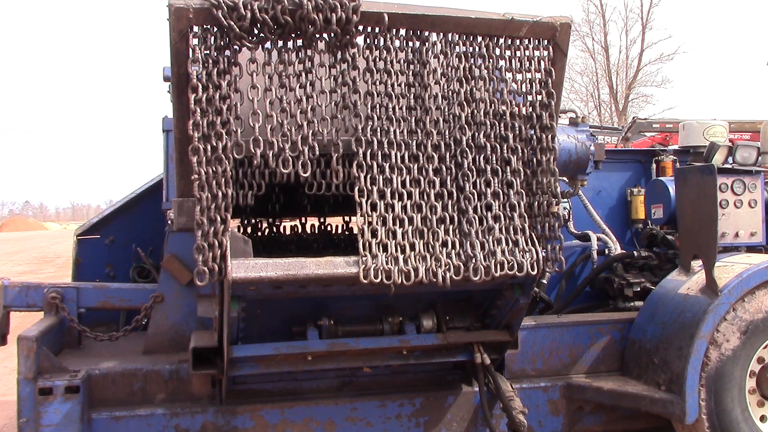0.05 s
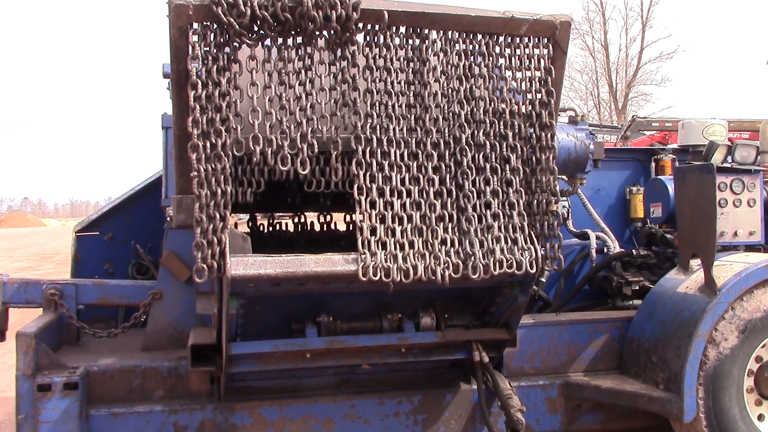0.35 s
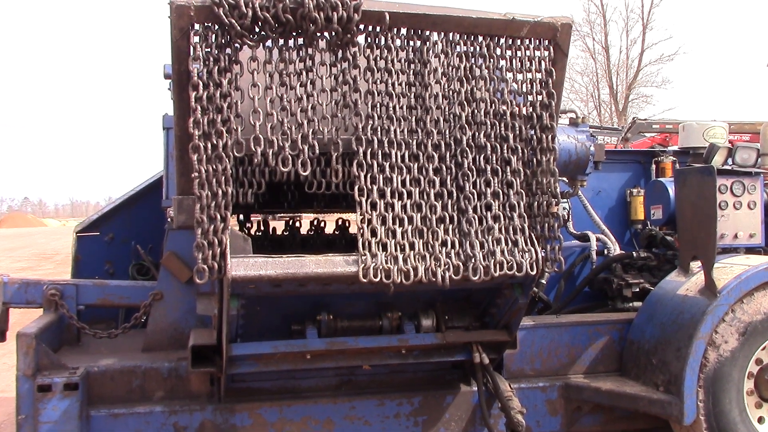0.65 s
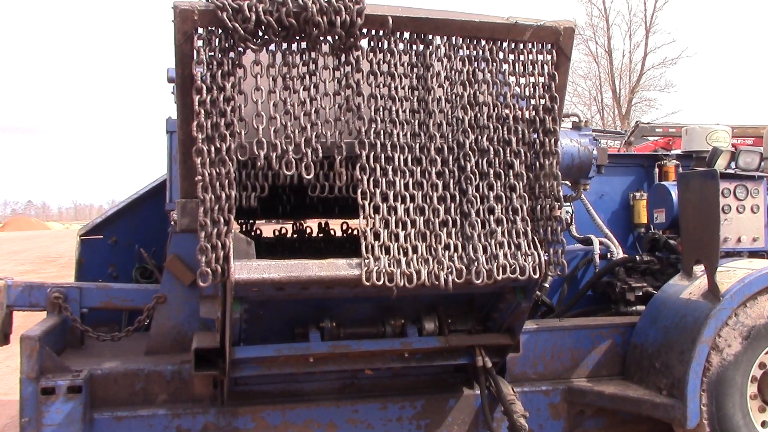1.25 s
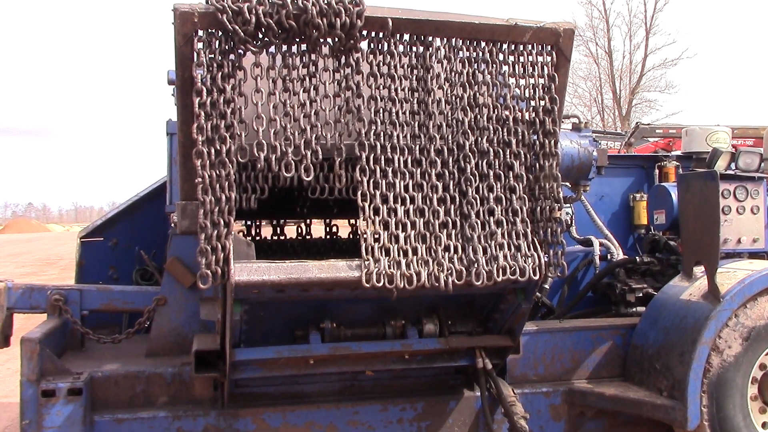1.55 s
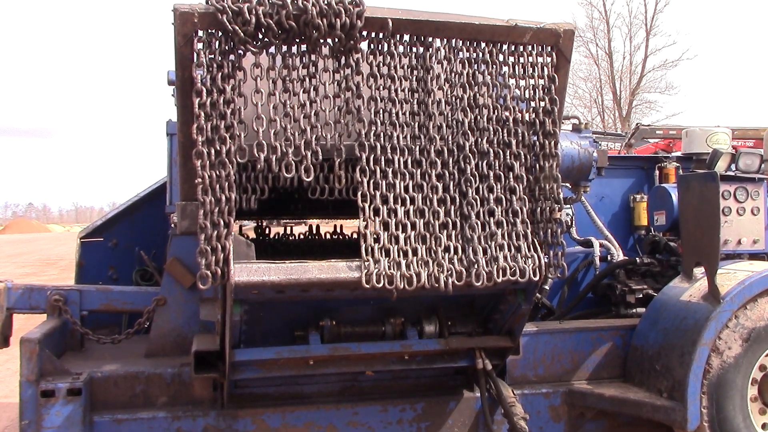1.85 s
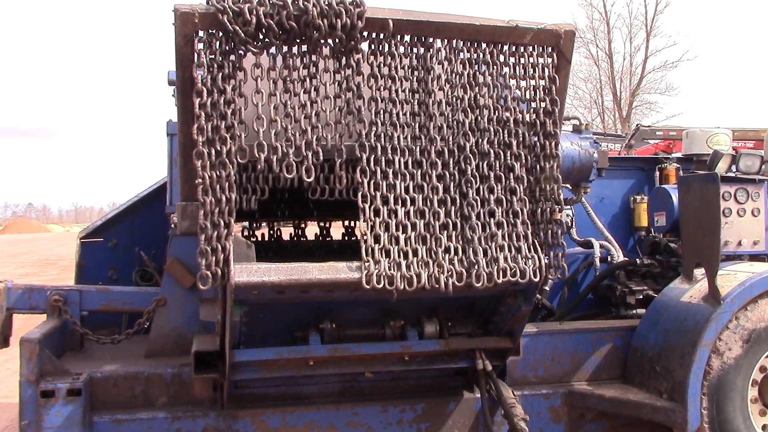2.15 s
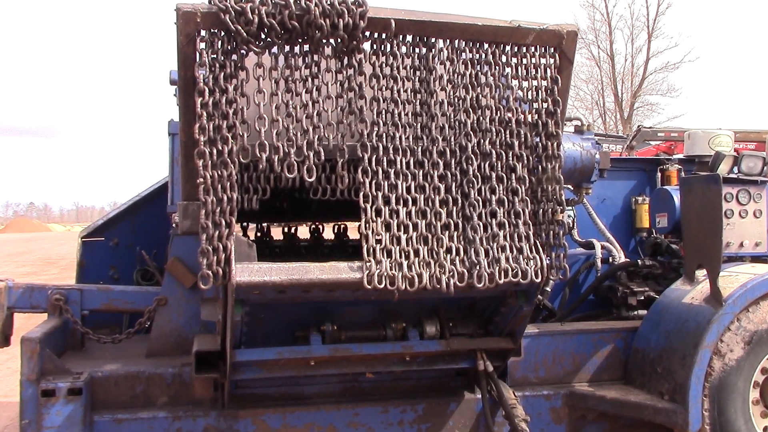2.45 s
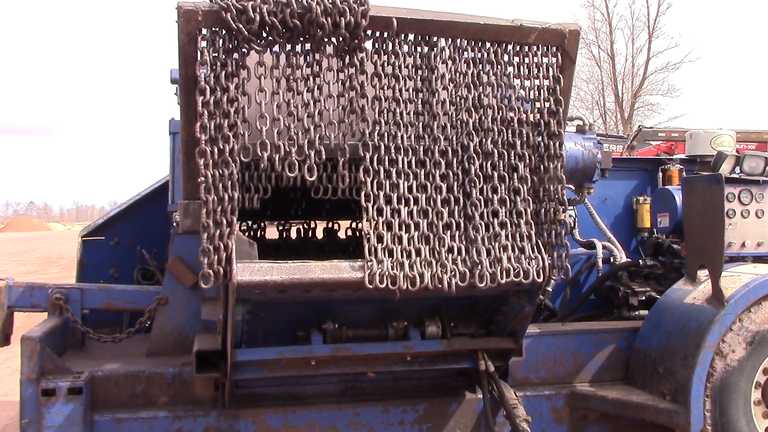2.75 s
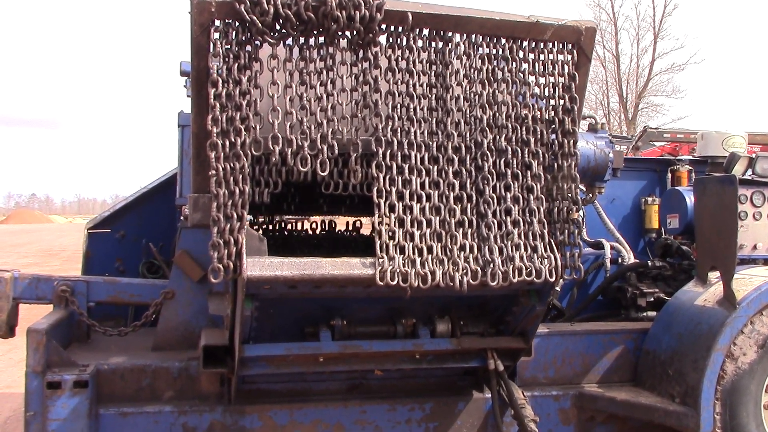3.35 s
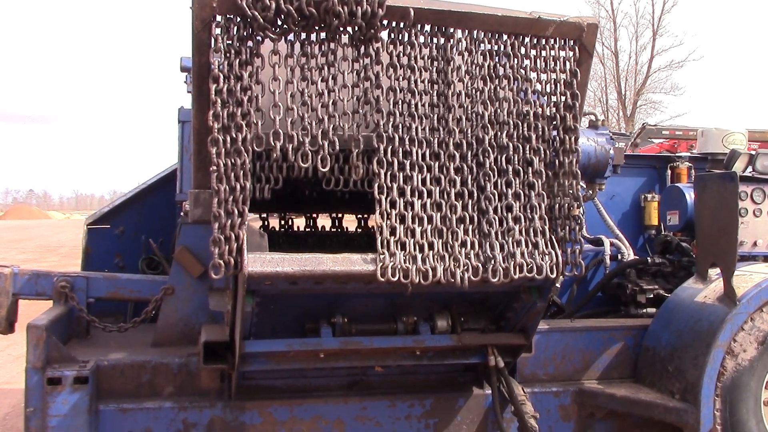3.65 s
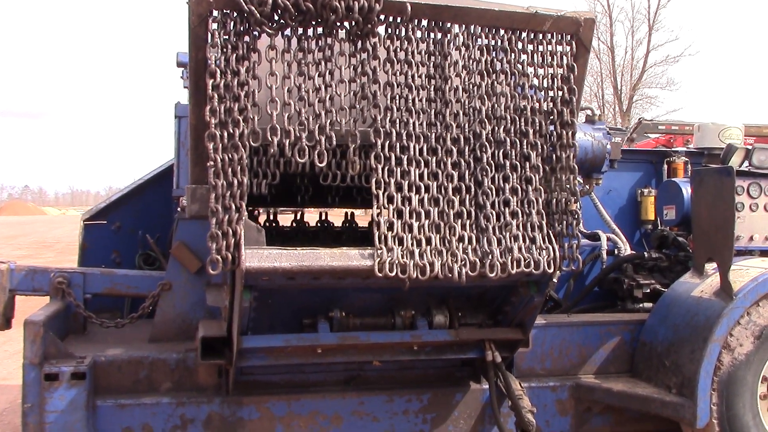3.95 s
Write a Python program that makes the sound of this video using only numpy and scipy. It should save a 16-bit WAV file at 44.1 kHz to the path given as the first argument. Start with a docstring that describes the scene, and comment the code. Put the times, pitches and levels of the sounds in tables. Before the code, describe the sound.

A heavy machine's diesel engine runs with a fast, rattling pulse straight in front of the microphone, outdoors. High metallic squeaks repeat throughout, and early on a steel clank leads into a short, gritty rush.

```python
"""Forestry flail at idle

Outdoors, beside a machine with a chain flail: its six-cylinder diesel thumps, knocks and clatters,
and the slowly turning drum rubs steel on steel, squeaking three times a second. After one second a
steel part clanks and a rough rush swells and stops. Light wind rumbles on the microphone."""
import sys
import numpy as np
from scipy import signal
from scipy.fft import rfft, irfft
from scipy.io import wavfile
from scipy.ndimage import uniform_filter1d

SR = 44100
rng = np.random.default_rng(int(sys.argv[2]) if len(sys.argv) > 2 else 0)


def persist_wave(psi):
    """Save psi, clipped to +-1, as 16-bit WAV."""
    counts = np.round(np.clip(psi, -1, 1) * 32767).astype(np.int16)
    wavfile.write(sys.argv[1], SR, np.atleast_2d(counts).T)


N = 176400
TIME = np.arange(N) / SR
CYCLE_HZ = 11.633  # all six cylinders fire once a cycle
CYCLES = int(N / SR * CYCLE_HZ) + 1

# One engine cycle. Each row: place in the cycle from 0 to 1, then thump, knock and clatter in dB.
FIRINGS = [(.03, -4, -6.5, 2), (.19, -7, -10, -11), (.345, -4, -6, 5.5), (.51, -8, -8, -3),
           (.69, -4, -5.5, 4), (.85, -5.5, -12, -3.5)]
# Spectra of the engine's parts. Each row: frequency in Hz, gain in dB.
EXHAUST_SPECTRUM = [(100, -45), (280, -21.5), (360, -12.5), (470, -15), (545, -3.5), (610, -7), (760, -10),
                    (1200, -48.5)]
KNOCK_SPECTRUM = [(120, -79), (620, -6), (820, -5), (1000, 5), (1150, 3), (1330, -5.5), (1500, 5),
                  (1850, -5), (4000, -33)]
VALVE_SPECTRUM = [(130, -70), (500, -24.5), (1200, 2.5), (2300, 0), (3000, 1), (3250, -7.5), (3600, -1.5),
                  (4100, -4.5), (5200, -7.5), (7000, -11), (10000, -3), (13000, -29.5), (15500, -65)]
FAN_SPECTRUM = [(60, -72), (250, -29.5), (450, -24.5), (620, -4), (850, -8.5), (1100, -1.5), (2300, 3.5),
                (3600, 4), (5000, -6.5), (7000, -4), (10000, -14), (12500, -18.5), (15000, -59)]
# Modes of the engine block, in Hz.
BLOCK_MODES_HZ = [992, 1101, 1145, 1244, 1433, 1575, 1827]
# The engine's rise and fall. Each row: time in seconds, bass and middle gain in dB, treble gain in dB.
ENGINE_LEVEL = [(0, -0.5, 1.5), (.45, -0.5, -.5), (.75, 3, 2), (1.05, 4.5, 1), (1.55, 8, -0.5),
                (1.72, -3, 0), (2.3, -9.5, 0.5), (2.8, -3, 1), (3.4, -5.5, 0), (3.56, -4.5, 2.5),
                (3.58, -6, -2), (3.62, -1.5, -3), (3.65, 0.5, 2), (3.75, 0.5, 2.5), (4, -2, 1.5)]
# Harder clinks of a loose panel. Each row: time in seconds, level in dB.
PANEL_CLINKS = [(.088, -1), (.6, -3), (.772, 1), (.943, 2), (1.17, -0.5), (1.229, 3.5), (1.288, 5),
                (1.458, 5), (1.805, -1), (2.15, 1), (2.321, -1), (2.351, 1), (2.666, 2), (3.034, 2.5),
                (3.35, -4), (3.523, -1.5), (3.696, 4), (3.808, -1)]
# Turns of the drum. Each row: time in seconds, then catch, squeal and after-squeal in dB.
DRUM_TURNS = [(0.204, -1.5, -2, -9), (.538, -4.5, -1.5, -2.5), (0.863, -3.5, -2, -1), (1.194, -0.5, 3.5, 6),
              (1.522, -0.5, 5, -7), (1.858, -7, -1, -6), (2.188, -8, -2.5, -2), (2.514, -6.5, -3.5, -2.5),
              (2.845, -4.5, -3, -1), (3.17, -4.5, -1, -3), (3.499, -3.5, 0.5, 1), (3.831, -4.5, 0, -2)]
# Steel modes of the drum. Each row: frequency and width in Hz, then level in dB in the catch,
# the squeal, the after-squeal and steady rubbing.
DRUM_MODES = [(6290, 230, -7, -26, -35, -20), (7600, 350, -3.5, -19, -4.5, -8.5),
              (7930, 170, -1, -20, -20, -15), (8280, 190, -15, -4.5, 3, -10),
              (8594, 110, -1.5, -6, 7, -3.5), (8930, 150, -4, 2.5, -12, -1.5), (9130, 260, 0.5, -3, 3.5, 3),
              (9400, 186, -2.5, -3.5, 6, 0), (9940, 430, 1, -25, 0, -8)]
# Stray chirps of the drum. Each row: start in seconds, pitch in Hz, level in dB.
DRUM_CHIRPS = [(.115, 9750, 3.5), (.47, 9500, 0.5), (1.755, 10300, -5), (2.122, 9570, 3),
               (2.797, 7820, 2.5), (3.08, 9400, 4.5), (3.43, 9570, 2.5), (3.635, 7750, 3.5),
               (3.789, 9330, 7.5)]
# Knocks on heavy steel. Each row: start in seconds, level in dB.
CLANKS = [(1.076, 0), (1.305, -10.5), (3.555, -22), (3.725, -13.5)]
# Modes of that steel. Each row: frequency in Hz, level in dB, decay in seconds.
CLANK_MODES = [(669, 5, 0.086), (1540, 7.5, 0.039), (1720, 9, 0.044), (2226, -2, 0.029), (2780, 6.5, 0.046)]
# Swell of the rush. Each row: time in seconds, level in dB.
RUSH_LEVEL = [(1.0, -62), (1.1, -31), (1.24, -25.5), (1.31, -20.5), (1.47, -16.5), (1.57, -15.5),
              (1.66, -21.5), (1.72, -53)]
# Spectrum of the rush. Each row: frequency in Hz, gain in dB.
RUSH_SPECTRUM = [(110, -46), (250, -20), (400, -15.5), (530, -2.5), (770, -7), (1120, -2.5), (2000, -4.5),
                 (3500, -3), (5000, -13), (7000, -12.5), (10000, -2.5), (12000, -29.5), (15500, -39)]
# Stereo width at the microphone. Each row: frequency in Hz, side gain in dB.
SIDE_SPECTRUM = [(700, -72), (1300, -66), (2000, -67), (3500, -17), (5000, -15.5), (9000, -12.5),
                 (13000, -11)]


def amp(db):
    return 10 ** (np.asarray(db) / 20)


def unit(x):
    return x / np.sqrt(np.mean(x ** 2) + 1e-20)


def noise(shape=N):
    return rng.standard_normal(shape)


def add(mix, start_s, sound):
    part = mix[max(round(start_s * SR), 0):][:len(sound)]
    part += sound[:len(part)]


def level(points, column=1):
    """Gain over time along one column of a dB curve."""
    points = np.array(points)
    return amp(np.interp(TIME, points[:, 0], points[:, column]))


def colour(x, spectrum):
    """Filters by a spectrum of (Hz, dB) points."""
    hz, db = np.transpose(spectrum)
    log_hz = np.log(np.fft.rfftfreq(N, 1 / SR) + 1)
    return irfft(rfft(x) * amp(np.interp(log_hz, np.log(hz), db)), N)


def ring(x, hz, width_hz):
    """A resonance with steep skirts, at unit RMS."""
    b, a = signal.iirpeak(hz, hz / (1.5 * width_hz), SR)  # two passes narrow it to about width_hz
    return unit(signal.lfilter(b, a, signal.lfilter(b, a, x)))


def drift(rate_hz):
    """Smooth random wander at unit RMS."""
    return unit(irfft(rfft(noise()) * np.exp(-(np.fft.rfftfreq(N, 1 / SR) / rate_hz) ** 2), N))


def envelope(t, attack_s, hold_s, decay_s):
    """Linear attack, hold and exponential release."""
    return np.clip(t / attack_s, 0, 1) * np.exp(-np.maximum(t - attack_s - hold_s, 0) / decay_s)


def firings(spectrum, column, attack_s, decay_s, spread_db, repeat_share=2 / 3):
    """Each cylinder repeats its own noise burst, partly fresh on every firing."""
    t, out = np.arange(4096) / SR, np.zeros(N)
    shape = envelope(t, attack_s, 0, decay_s)
    signatures = noise((len(FIRINGS), len(t)))
    for _ in range(4):  # even out each burst in spectrum, then in time
        flat = irfft(np.exp(1j * np.angle(rfft(signatures * shape))))
        signatures = flat / np.sqrt(abs(uniform_filter1d(flat ** 2, size=128)) + 1e-20)
    for cycle in range(CYCLES):
        for firing, signature in zip(FIRINGS, signatures):
            burst = np.sqrt(repeat_share) * signature + np.sqrt(1 - repeat_share) * noise(len(t))
            strength = amp(rng.normal(firing[column], spread_db))
            start_s = (cycle + firing[0]) / CYCLE_HZ + rng.normal(0, 4e-5)
            add(out, start_s, strength * burst * shape)
    return unit(colour(out, spectrum))


def engine():
    """Firings thump in the exhaust, ring the block and clatter the valves, over fan and gear whine."""
    thump = amp(-41.5) * firings(EXHAUST_SPECTRUM, 1, 0.00747, 0.0165, spread_db=2, repeat_share=0.49)
    knock = amp(-32) * firings(KNOCK_SPECTRUM, 2, 0.0034, 0.0133, spread_db=1.6)
    clatter = amp(-28.5) * firings(VALVE_SPECTRUM, 3, 0.00051, 0.026, spread_db=2.3)
    fan = amp(-28.5) * unit(colour(noise(), FAN_SPECTRUM))
    whine = amp(-38.5) * ring(noise(), hz=3558, width_hz=135)
    block = amp(-48.5) * sum(ring(knock, hz, width_hz=23.5) for hz in BLOCK_MODES_HZ)
    body = (thump + knock + block) * level(ENGINE_LEVEL, column=1)
    treble = (clatter + fan + whine) * level(ENGINE_LEVEL, column=2)
    return body + treble


def exhaust_pipe(pitch_hz=550, sag_hz_per_s=590):
    """Once a cycle a firing rings the pipe with a short sagging hoot."""
    t, out = np.arange(4096) / SR, np.zeros(N)
    for cycle in range(CYCLES):
        hz = pitch_hz * rng.normal(1, 0.015) - sag_hz_per_s * t
        hoot = np.sin(2 * np.pi * np.cumsum(hz) / SR) * envelope(t, 0.0096, 0.012, 0.019)
        add(out, (cycle + 0.0613) / CYCLE_HZ, hoot)
    return amp(-37.5) * out * level(ENGINE_LEVEL, column=1)


def loose_panel(spread_db=2):
    """Every second firing shakes a loose panel; now and then it clinks harder."""
    shake = np.zeros(N)
    tap = envelope(np.arange(2048) / SR, 0.0006, 0.0076, 0.0054)
    for cycle in range(CYCLES):
        for place, *_ in FIRINGS[::2]:
            strength = amp(-spread_db * np.clip(rng.normal(), -2, 2))
            add(shake, (cycle + place) / CYCLE_HZ, strength * tap)
    hits = sum(amp(db) * envelope(TIME - s + 0.00097, 0.001, 0.015, 0.0063) for s, db in PANEL_CLINKS)
    rattle = amp(-39.5) * ring(shake * noise(), hz=4507, width_hz=150)
    clinks = amp(-38.5) * ring(hits * noise(), hz=4525, width_hz=160)
    return rattle + clinks


def drum(squeal_delay_s=0.058, after_delay_s=0.1503):
    """Each turn catches, squeals upward and squeals again, over steady rubbing."""
    catch, squeal, after, whistles = np.zeros((4, N))
    for s, catch_db, squeal_db, after_db in DRUM_TURNS:
        t = TIME - s
        catch += amp(catch_db) * envelope(t + 0.0043, 0.0071, 0.027, 0.035)
        squeal += amp(squeal_db) * envelope(t - squeal_delay_s, 0.0079, 0.086, 0.016)
        after += amp(after_db) * envelope(t - after_delay_s, 0.031, 0.028, 0.011)
        add(whistles, s + squeal_delay_s, amp(squeal_db) * drum_whistle())
    return (whistles
            + amp(-14) * catch * rubbing(grain_db=2, flutter_db=3.5, column=2)
            + amp(-22) * squeal * rubbing(grain_db=6.5, flutter_db=0, column=3)
            + amp(-21) * after * rubbing(grain_db=3, flutter_db=3, column=4)
            + amp(-26.5 + 1.5 * np.tanh(drift(19))) * rubbing(grain_db=1, flutter_db=5.5, column=5))


def rubbing(grain_db, flutter_db, column):
    """Tiny uneven slips ring the drum's steel modes, each wavering by up to flutter_db."""
    slips = amp(grain_db * np.tanh(drift(440)))
    out = np.zeros(N)
    for mode in DRUM_MODES:
        gain = amp(mode[column] + flutter_db * np.tanh(drift(20)))
        out += gain * ring(slips * noise(), hz=mode[0], width_hz=mode[1])
    return unit(out)


def drum_whistle(pitch_hz=8100, rise_hz_per_s=4800, width_hz=106):
    """A short bite, then a narrow whistle that climbs and stutters as it fades."""
    t = np.arange(8192) / SR
    stutter = signal.sosfilt(signal.butter(2, width_hz / 2, fs=SR, output="sos"), noise((2, len(t))))
    phase = 2 * np.pi * np.cumsum(rng.normal(pitch_hz, 50) + rise_hz_per_s * t) / SR
    tone = unit(stutter[0] * np.cos(phase) + stutter[1] * np.sin(phase))
    whistle = amp(-21.5) * envelope(t, 0.0039, 0.028, 0.046) * tone
    bite = amp(-23) * envelope(t, 0.0018, 0.045, 0.0089) * ring(noise(len(t)), hz=8470, width_hz=180)
    return whistle + bite


def drum_chirps():
    """Now and then a single steel mode sings out briefly."""
    return amp(-26.5) * sum(
        amp(db) * envelope(TIME - s, 0.008, 0.02, 0.018) * ring(noise(), hz, width_hz=190)
        for s, hz, db in DRUM_CHIRPS)


def clank(start_s, strength_db):
    """A knock on heavy steel: a jarring crunch and briefly ringing modes."""
    t, modes = TIME - start_s, np.zeros(N)
    jar = noise() * envelope(t, 0.0041, 0.018, 0.026)
    crunch = colour(jar, [(90, -38), (620, 6), (790, -2.5), (1000, 7),
                          (2900, 1.5), (3600, -11), (8000, -51)])
    for hz, db, decay_s in CLANK_MODES:
        phase = 2 * np.pi * np.cumsum(hz * (1 + 0.0139 * drift(80))) / SR
        modes += amp(db) * np.sin(phase) * envelope(t, 0.0063, 0.016, decay_s)
    return amp(strength_db) * (amp(-29) * modes + amp(-12) * crunch)


def rush(grain_db=2):
    """A gritty rush that swells and drops away."""
    grit = noise() * amp(grain_db * drift(190))
    return level(RUSH_LEVEL) * unit(colour(grit, RUSH_SPECTRUM))


def wind(gust_db=5):
    """Faint lumpy rumble on the microphone."""
    rumble = colour(noise(), [(110, 0), (1000, -60)])
    return amp(-80) * unit(rumble * amp(gust_db * drift(8)))


def scene():
    """The machine stands straight ahead of the microphone; only its treble spreads to the sides."""
    mid = engine() + exhaust_pipe() + loose_panel() + drum() + drum_chirps()
    mid += sum(clank(s, db) for s, db in CLANKS) + rush() + wind()
    scatter = noise(600) * (np.arange(600) > 60)  # delays of about 1.4 to 14 ms
    scattered = signal.fftconvolve(mid, scatter / np.linalg.norm(scatter))[:N]
    side = colour(scattered, SIDE_SPECTRUM)
    return np.array([mid + side, mid - side])


def record(dry, start_s=0.045, ceiling=0.93, cutoff_hz=15400):
    """A slightly lopsided microphone turns loud squeaks into faint rumble; peaks and top round off."""
    opened = dry * np.clip((TIME - start_s) / 0.003, 0, 1)  # the sound cuts in
    rumble = signal.lfilter(*signal.butter(2, [12, 150], "band", fs=SR), opened ** 2)
    bent = opened + amp(-43) * rumble
    rounded = bent / (1 + (bent / ceiling) ** 8) ** (1 / 8)
    lowpass = signal.firwin(511, cutoff_hz, window=("kaiser", 9), fs=SR)
    return signal.oaconvolve(rounded, lowpass[None], "same")


dry = scene()
out = record(dry)
persist_wave(out)
```